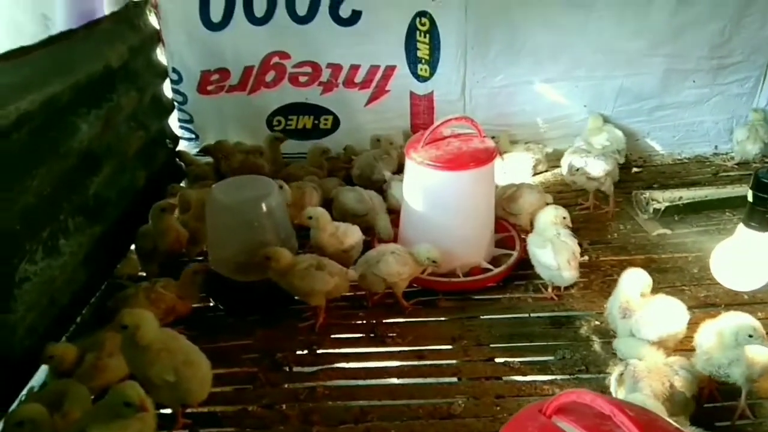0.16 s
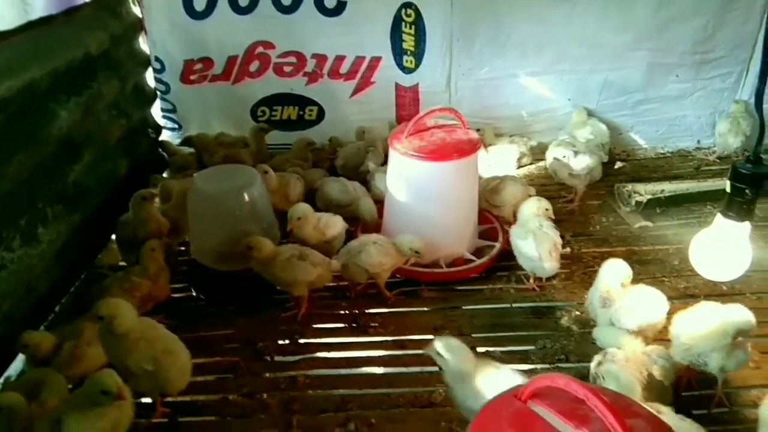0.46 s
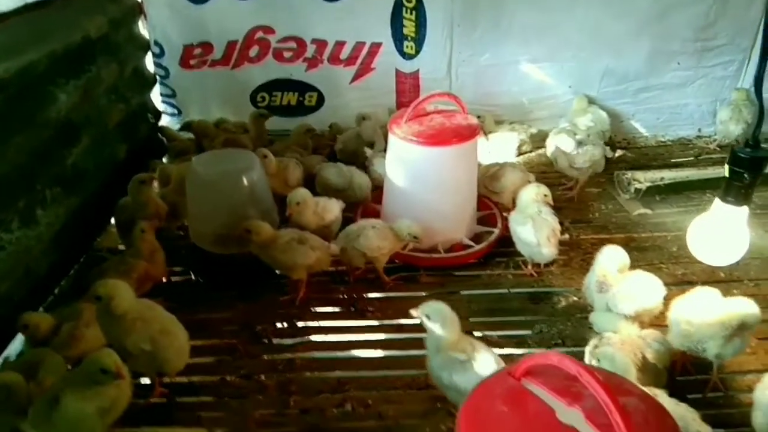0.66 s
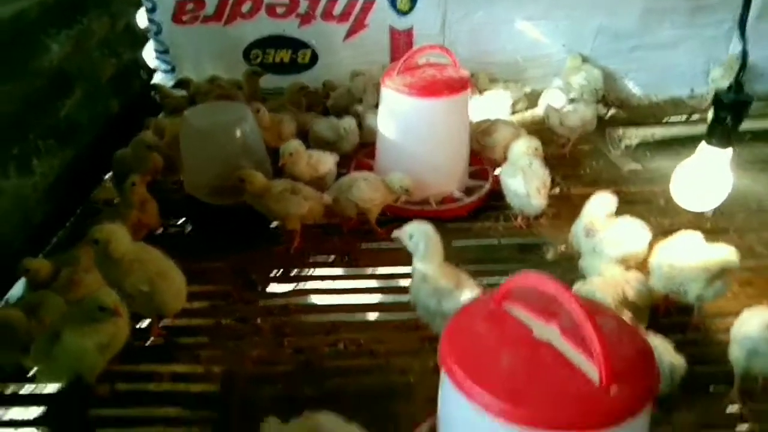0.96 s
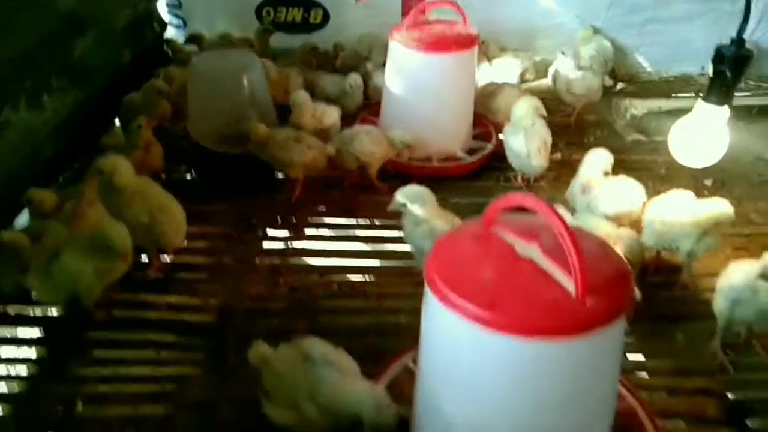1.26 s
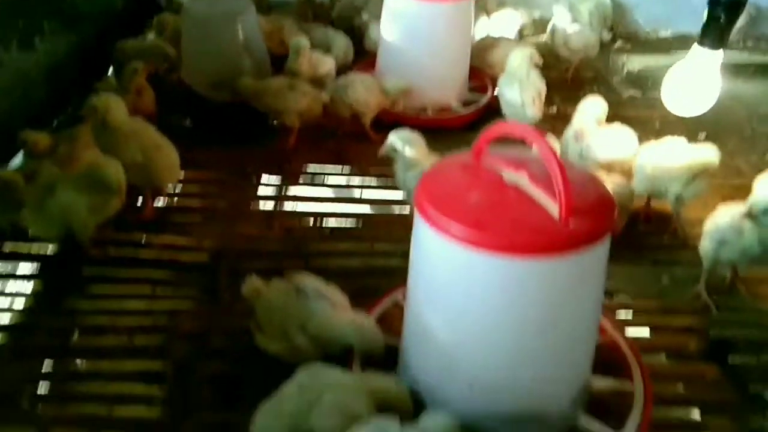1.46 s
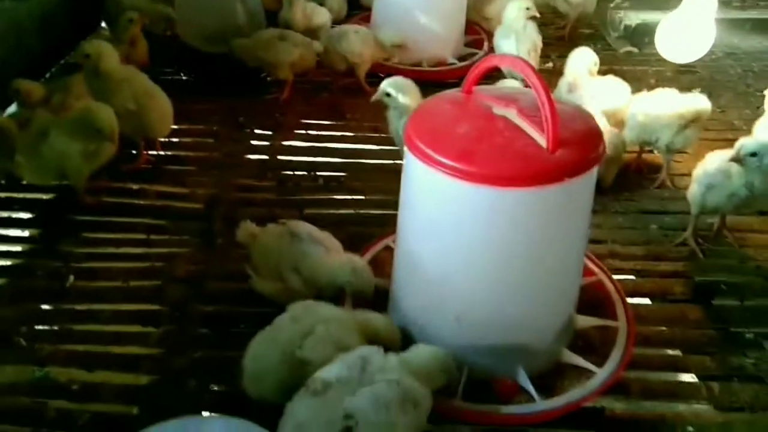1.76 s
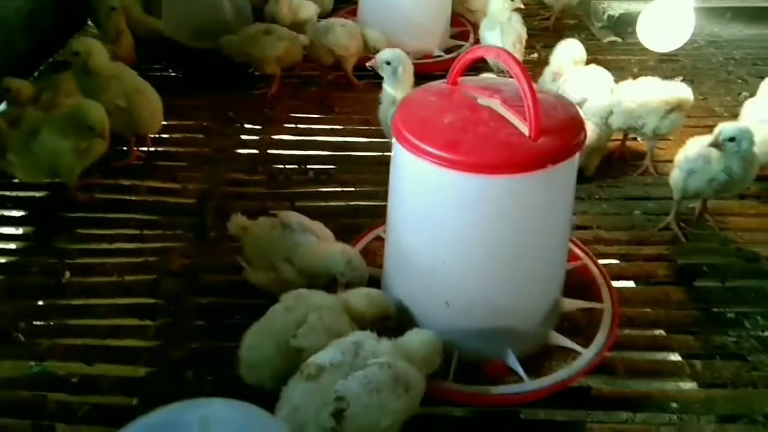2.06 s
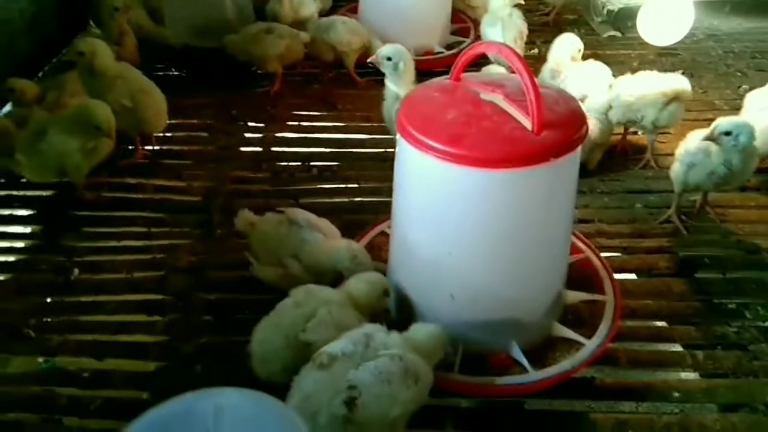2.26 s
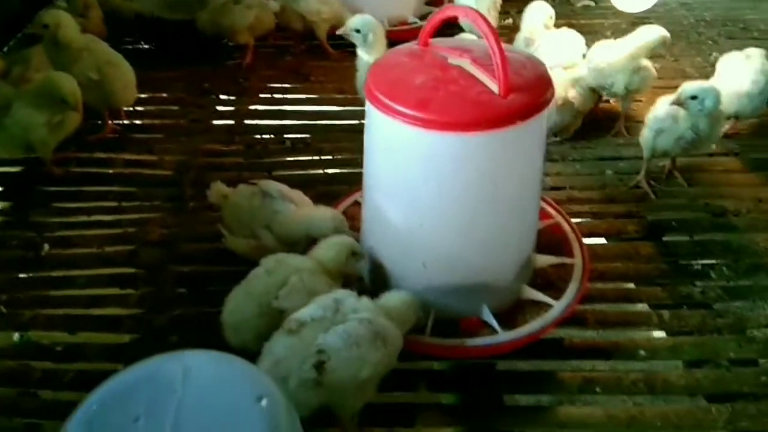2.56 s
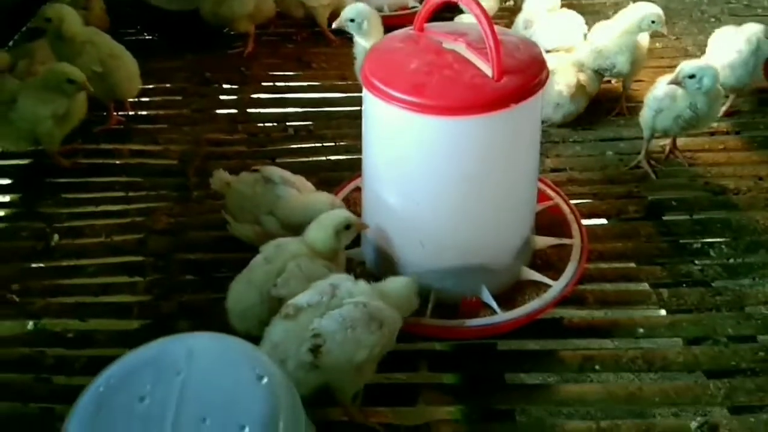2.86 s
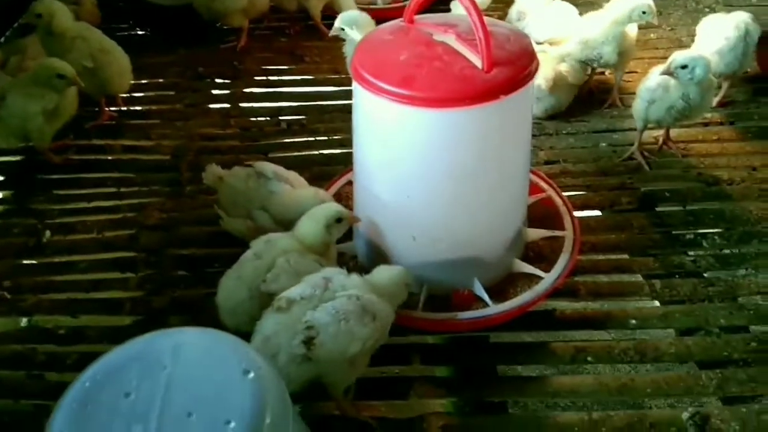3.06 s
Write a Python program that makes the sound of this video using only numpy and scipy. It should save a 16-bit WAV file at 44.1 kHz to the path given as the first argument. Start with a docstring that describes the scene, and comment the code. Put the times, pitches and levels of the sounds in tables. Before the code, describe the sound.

Many young chicks give short, clear, mostly falling peeps, close by and farther off, in a small walled brooder. Beaks and feet knock lightly on slats; a loud, high, jet-like hiss fades with everything.

```python
"""Young chicks in a brooder

Dozens of chicks peep in a small walled brooder: short, nearly pure gliding whistles that mostly fall in pitch,
each with a second harmonic and echoed by the near walls. Decaying rings and noise make the knocks of beaks
and feet on the slatted floor and the feeders. A high hiss of shaped noise, like a thin jet of air or water,
fades along with everything else; thin whistling lines join it late. Faint hoots, scuffs and a low rumble
lie beneath."""
import sys
import numpy as np
from scipy import signal
from scipy.fft import rfft, irfft
from scipy.io import wavfile

SR = 44100
rng = np.random.default_rng(int(sys.argv[2]) if len(sys.argv) > 2 else 0)


def file_out(sig):
    """Save sig as 16-bit WAV at sys.argv[1]."""
    # one column per channel
    cols = np.atleast_2d(sig).T
    # limit, then scale
    lim = np.clip(cols, -1, 1)
    pcm = np.round(lim * 32767).astype(np.int16)
    wavfile.write(sys.argv[1], SR, pcm)


N = 141120  # samples in the scene: 3.2 s

# Pitch contours: heights from bottom (0) to top (1), evenly spaced in time
ARCH, FALL, SAG, DIP = (.7, 1, .6, 0), (1, .65, 0), (1, .5, .3, 0), (.6, 0, 1)
# Tone of a claw or beak scraping: f/Hz, level/dB
SCRAPE_COLOUR = [(400, 2.5), (1800, -2.5), (10000, -26)]
SHED_FALL_DB_PER_S = 5.5  # fading of the shed and of the scuffs
TICK_TOP_HZ = 3540  # taps and scuffs weaken steadily with frequency, to about a third here
KNOCK_DECAY_S = 0.017


def undb(db):
    """Turn decibels into a gain."""
    return 10 ** (np.asarray(db) / 20)


def shape(points, hz):
    """Join (f/Hz, level/dB) points by straight lines on a log-frequency axis."""
    p = np.array(points)
    return np.interp(np.log(hz + 1), np.log(p[:, 0]), p[:, 1])


def noise(gain_at):
    """Make noise of rms 1 by weighting the spectrum of white noise with a function of frequency."""
    spectrum = rfft(rng.standard_normal(N))
    y = irfft(spectrum * gain_at(np.fft.rfftfreq(N, 1 / SR)), N)
    return y / y.std()


def walk(rate_hz):
    """Wander smoothly at random, with spread 1 and few changes faster than the given rate."""
    return noise(lambda f: np.exp(-(f / rate_hz) ** 2))


def add(out, start, sound):
    """Mix a sound in at a time in seconds, cutting what falls outside the scene."""
    i = int(start * SR)
    a, b = max(i, 0), min(i + len(sound), N)
    if b > a:
        out[a:b] += sound[a - i:b - i]


def shed():
    """Low background of air and shuffling: shaped noise whose level wavers as it fades."""
    # Tone of the rumble: f/Hz, level/dB
    shed_colour = [(25, -30), (60, -6.5), (230, -3.5), (350, -11), (1200, -17.5), (4500, -12.5),
                   (9000, -32)]
    start_db, waver_db = -54, 2.06
    rumble = noise(lambda f: undb(shape(shed_colour, f)))
    fade_db = start_db - SHED_FALL_DB_PER_S * np.arange(N) / SR
    return rumble * undb(fade_db + waver_db * walk(rate_hz=5.0))


def ripple():
    """Random narrow peaks and dips in dB, such as echoes lay over a spectrum."""
    ripple_db, spread_s = 3.5, 0.018  # a longer time spread makes the peaks narrower
    y = rfft(rng.standard_normal(N) * np.exp(-np.arange(N) / SR / spread_s)).real
    return ripple_db * y / y.std()


def hiss():
    """A rush of noise with narrow resonances fades; late on, thin unsteady whistles stand out of it."""
    # Broad tone of the rush: f/Hz, level/dB
    hiss_colour = [(4500, -37.5), (5300, -28), (6250, -9.5), (6700, -6.5), (7800, -4), (9000, -13.5),
                   (9500, -21), (11800, -46), (15500, -44.5)]
    # Resonances of the rush: f/Hz, width/Hz, level above the broad tone/dB
    resonances = [(5636, 56, 10), (6500, 127, 10.5), (6750, 32, 4.5), (6860, 400, 6.5), (7344, 340, 6.5),
                  (7844, 170, 3)]
    # Whistling lines: f/Hz, level against the rush/dB
    whistle_lines = [(6150, -13.5), (6590, -7.5), (7450, -9.5)]
    whistle_from_s, half_width_hz = 2.07, 4.5  # each line has half its gain this far from its centre
    start_db, fall_db, bend = -29, 3.5, 1.573  # level at first, fall after one second, power of time

    def rush_gain(f):
        peaks_db = sum(db / (1 + (2 * (f - hz) / width) ** 2) for hz, width, db in resonances)
        return undb(shape(hiss_colour, f) + ripple() + peaks_db)

    rush = noise(rush_gain)
    lines = np.zeros(N)
    for hz, db in whistle_lines:
        lines += undb(db) * noise(lambda f: 1 / (1 + ((f - hz) / half_width_hz) ** 2))
    t = np.arange(N) / SR
    whistling = (t > whistle_from_s).astype(float)  # the whistles join all at once
    level_db = start_db - fall_db * t ** bend
    # Dividing keeps the overall power about the same when the whistles join
    return undb(level_db) * (rush + whistling * lines) / np.sqrt(1 + whistling ** 2 * lines.var())


def scuffs():
    """Tiny steps all over the floor: short scratches of noise at random moments, fading like the shed."""
    per_s, start_db = 17, -52.5
    out, t = np.zeros(N), np.arange(SR // 10) / SR
    scratch = noise(lambda f: np.exp(-f / TICK_TOP_HZ) * undb(shape(SCRAPE_COLOUR, f) / 2))
    for when, size in rng.random((int(per_s * N / SR), 2)):
        start = when * N / SR
        db = start_db - SHED_FALL_DB_PER_S * start + 6 * size ** 2
        piece = np.roll(scratch, -int(start * SR))[:len(t)]  # a different stretch each time
        add(out, start, undb(db) * np.exp(-2 * t / KNOCK_DECAY_S) * piece)
    return out


def hoots():
    """Faint, soft sine tones well below the peeps, each gliding a little as it swells and dies."""
    # Hoots: t/s, length/s, peak level/dB, first f/Hz, last f/Hz
    hoot_list = [(.615, 0.067, -51.5, 920, 938), (2.549, 0.084, -60.5, 263, 205)]
    out = np.zeros(N)
    for start, length, db, first, last in hoot_list:
        hz = np.linspace(first, last, int(length * SR))
        tone = np.sin(2 * np.pi * np.cumsum(hz) / SR)
        add(out, start, undb(db) * np.hanning(len(hz)) * tone)
    return out


def beak_taps():
    """Sharp beak taps on plastic: dull noise that dies within milliseconds."""
    # Taps: t/s, level/dB
    tap_list = [(1.014, -41.5), (1.751, -47), (2.519, -49)]
    decay_s = 0.0024
    out, t = np.zeros(N), np.arange(SR // 10) / SR
    for start, db in tap_list:
        plastic = noise(lambda f: np.exp(-f / TICK_TOP_HZ))
        add(out, start, undb(db) / 2 * np.exp(-t / decay_s) * plastic[:len(t)])
    return out


def knocks():
    """Feet and beaks make the slats ring, each blow stressing other modes, with a brief scrape."""
    # Pecks and steps: t/s, level/dB, strongest ring f/Hz
    knock_list = [(.068, -39, 447), (.415, -36, 390), (.776, -43, 526), (.834, -41, 1310),
                  (1.131, -40.5, 640), (1.329, -47, 890), (1.621, -49, 670), (1.687, -52, 507),
                  (2.237, -50.5, 422), (2.294, -52, 520), (3.126, -56, 684)]
    # Ringing modes of the floor slats: f/Hz, level/dB, time to fall by 60 dB/s
    slat_modes = [(358, 0.5, 0.074), (459, -0.5, 0.068), (722, -1.5, 0.063), (924, -0.5, 0.039),
                  (1266, -7.5, 0.038)]
    detune, focus_db_per_octave = 0.034, 10  # random share of mode pitch; loss away from the strongest ring
    rise_s, ring_db, scrape_db = 0.0009, -2.5, -9.5
    out, t = np.zeros(N), np.arange(SR // 10) / SR
    mode_hz, mode_db, t60 = np.array(slat_modes).T[:, :, None]
    for start, db, centre in knock_list:
        hz = mode_hz * (1 + detune * rng.standard_normal(mode_hz.shape))
        weight = undb(mode_db - focus_db_per_octave * abs(np.log2(hz / centre)))
        modes = weight * undb(-60 * t / t60) * np.sin(2 * np.pi * hz * t)
        ring = modes.sum(axis=0) / np.linalg.norm(weight)
        rough = noise(lambda f: undb(shape(SCRAPE_COLOUR, f)))[:len(t)]
        scrape = np.exp(-t / KNOCK_DECAY_S) * rough
        blow = undb(ring_db) * ring + undb(scrape_db) * scrape
        add(out, start, undb(db) * (1 - np.exp(-t / rise_s)) * blow)
    return out


def flock():
    """Faint falling peeps at random moments from the far end, growing quieter."""
    per_s, length_s, middle_hz = 13, .07, 3133
    spread = 0.11  # share of pitch: how far calls differ, and how far each reaches above and below its middle
    loudest_db, fade_db_per_s = -53, 3
    calls = []
    for when, pitch, size in rng.random((int(per_s * N / SR), 3)):
        start = when * N / SR
        hz = middle_hz * (1 + spread * (pitch - .5))
        db = loudest_db - fade_db_per_s * start - 10 * size
        calls.append((start, length_s, db, hz * (1 + spread), hz * (1 - spread), FALL))
    return chicks(calls)


def peep(length, pitches, wobble, flutter):
    """One whistle that bends through its pitches, swelling and dying; low notes have the stronger overtone."""
    # Second harmonic: pitch f/Hz, level against the main tone/dB
    overtone = [(2250, -12), (2700, -21), (3500, -26)]
    attack_share, release_share = 0.23, 0.15  # of the peep's length
    rough_per_octave = 4.5  # the further apart its first and last pitches, the more a peep shakes
    level_wobble, level_flutter_db = .004, .6  # pitch share and level spread of a note that ends where it began
    beak_top_hz = 3760  # higher notes come out weaker
    u = np.linspace(0, 1, int(length * SR))  # progress through the peep
    shake = 1 + rough_per_octave * abs(np.log2(pitches[0] / pitches[-1]))
    # A smooth polynomial passes through all the pitches
    bend = np.polyfit(np.linspace(0, 1, len(pitches)), pitches, len(pitches) - 1)
    hz = np.polyval(bend, u) * (1 + shake * level_wobble * wobble[:len(u)])
    phase = 2 * np.pi * np.cumsum(hz) / SR
    rise = np.sin(np.pi / 2 * np.minimum(u / attack_share, 1))
    fall = np.sin(np.pi / 2 * np.minimum((1 - u) / release_share, 1))
    beak = 1 / np.sqrt(1 + (hz / beak_top_hz) ** 10)
    gain = rise * fall * undb(shake * level_flutter_db * flutter[:len(u)]) * beak
    return np.sqrt(2) * gain * (np.sin(phase) + undb(shape(overtone, hz)) * np.sin(2 * phase))


def chicks(calls):
    """Play a list of peeps, each with its own slight unsteadiness of pitch and level."""
    out, wobble, flutter = np.zeros(N), walk(rate_hz=165), walk(rate_hz=330)
    for start, length, db, top, bottom, contour in calls:
        pitches = bottom + (top - bottom) * np.array(contour)
        i = int(start * SR)
        whistle = peep(length, pitches, np.roll(wobble, -i), np.roll(flutter, -i))
        add(out, start, undb(db) * whistle)
    return out


def near_chicks():
    """The chicks close by: whistles that glide along their own pitch contours."""
    # Peeps: t/s, length/s, level/dB, top f/Hz, bottom f/Hz, contour
    peep_list = [ (.07, .09, -40, 3246, 2880, ARCH), (.15, 0.11, -30, 2803, 2556, ARCH),
                 (.183, 0.032, -42.5, 4160, 2624, FALL), (.205, 0.062, -36.5, 3380, 2810, FALL),
                 (.315, 0.07, -53.5, 1874, 1340, FALL), (.335, 0.045, -38.5, 3634, 2600, FALL),
                 (.39, 0.079, -38.5, 4170, 3150, SAG), (.412, 0.066, -36, 4126, 2264, FALL),
                 (.478, 0.042, -34, 3180, 3000, DIP), (.512, 0.12, -34, 3496, 2402, SAG),
                 (.555, .082, -41, 3900, 2900, ARCH), (.712, .058, -50, 3474, 2520, FALL),
                 (.838, 0.058, -39.5, 2864, 2470, ARCH), (.855, 0.047, -45.5, 3740, 2920, FALL),
                 (.938, 0.049, -41, 3360, 3030, ARCH), (.99, 0.11, -34, 2894, 2565, FALL),
                 (1.075, 0.034, -42, 3900, 2910, SAG), (1.197, 0.088, -48, 4400, 2767, SAG),
                 (1.385, 0.055, -46, 3910, 3220, ARCH), (1.415, .078, -46.5, 4700, 2497, SAG),
                 (1.495, .075, -52.5, 2560, 2380, DIP), (1.55, 0.071, -47.5, 3880, 3280, ARCH),
                 (1.68, 0.05, -51.5, 3220, 2570, FALL), (1.79, 0.063, -48, 3170, 2714, SAG),
                 (1.935, 0.076, -53, 3260, 2546, DIP), (2.02, 0.093, -49.5, 4550, 2630, SAG),
                 (2.08, 0.068, -47.5, 3396, 3180, FALL), (2.126, 0.051, -50, 2676, 2325, ARCH),
                 (2.238, 0.095, -52, 3110, 2894, SAG), (2.29, 0.088, -47, 4670, 2250, SAG),
                 (2.32, 0.024, -52.5, 2510, 2390, DIP), (2.405, 0.059, -51, 3800, 3120, ARCH),
                 (2.523, 0.041, -58, 2250, 2176, DIP), (2.592, .12, -53, 3755, 2550, FALL),
                 (2.655, 0.1, -50.5, 3415, 2506, FALL), (2.735, 0.099, -51, 3460, 2193, SAG),
                 (2.755, 0.085, -53.5, 3900, 2700, ARCH), (2.84, 0.051, -46.5, 3620, 2460, FALL),
                 (2.915, 0.071, -55.5, 4020, 2680, ARCH), (2.935, 0.068, -55.5, 3400, 2276, SAG),
                 (2.962, 0.071, -49.5, 3720, 2510, ARCH), (3.035, .13, -53.5, 3425, 2530, FALL),
                 (3.12, 0.052, -54.5, 3920, 2700, ARCH)]
    return chicks(peep_list)


def echoes(decay_s):
    """A dense train of random reflections of unit energy that builds up and dies away."""
    t = np.arange(SR // 2) / SR
    y = rng.standard_normal(len(t)) * np.exp(-t / decay_s) * np.minimum(t / (decay_s / 2), 1)
    return y / np.linalg.norm(y)


def brooder(near, far):
    """Near sounds come direct, off the close walls and with a short tail; far ones only as tail."""
    walls_decay_s, walls_db = 0.0054, -3.5
    room_t60_s, room_db = 0.21, -6.5  # the tail takes t60 to fall by 60 dB
    walls, tail = echoes(walls_decay_s), echoes(room_t60_s / np.log(1000))
    off_walls = undb(walls_db) * signal.fftconvolve(near, walls)
    in_tail = signal.fftconvolve(undb(room_db) * near + far, tail)
    return near + (off_walls + in_tail)[:N]


def scene():
    """Chicks, knocks, taps, scuffs and faint hoots in the brooder, with the hiss and the shed behind."""
    near = near_chicks() + knocks() + beak_taps() + scuffs() + hoots()
    return (hiss() + shed() + brooder(near, flock()))[None]


def record(dry):
    """The recorder cuts the top: a steep low-pass filter removes what lies above 15.5 kHz."""
    low_pass = signal.ellip(10, .2, 70, 15500, fs=SR, output="sos")
    return signal.sosfilt(low_pass, dry)


dry = scene()
out = record(dry)
file_out(out)
```